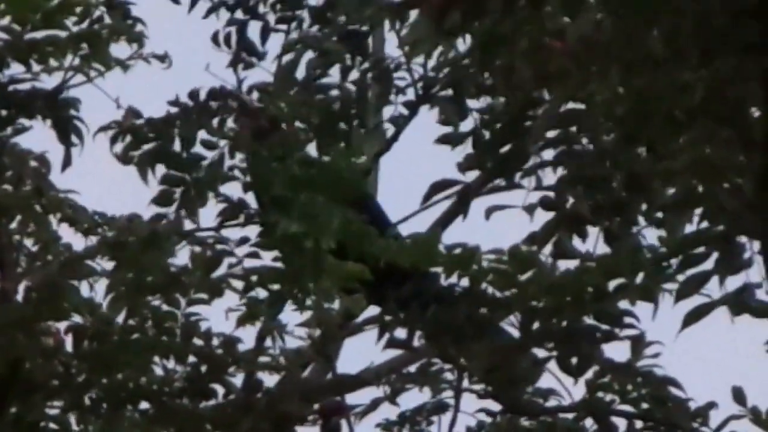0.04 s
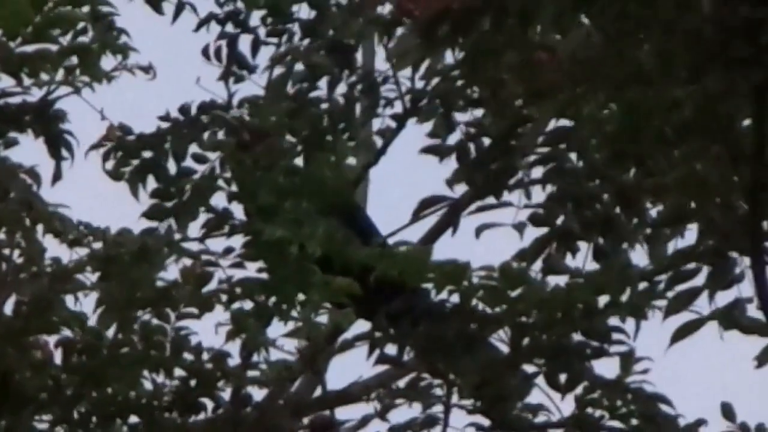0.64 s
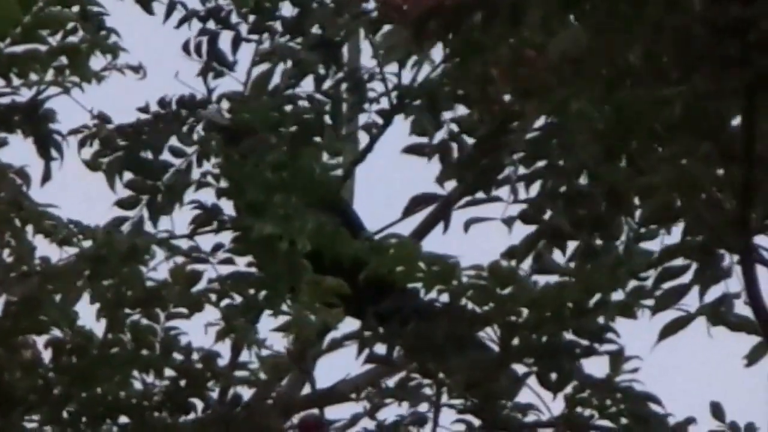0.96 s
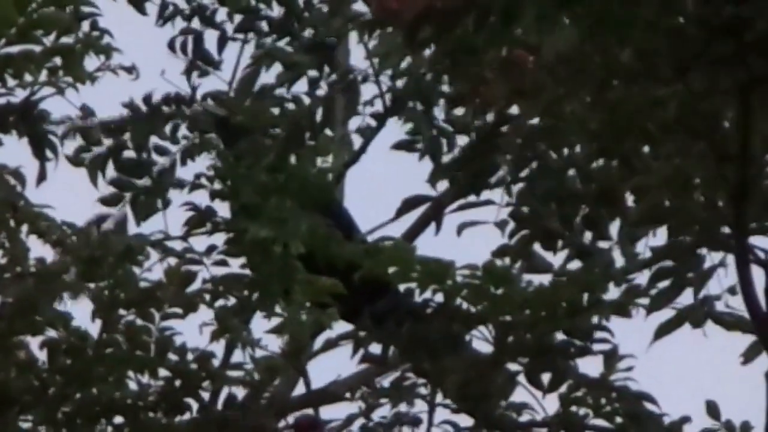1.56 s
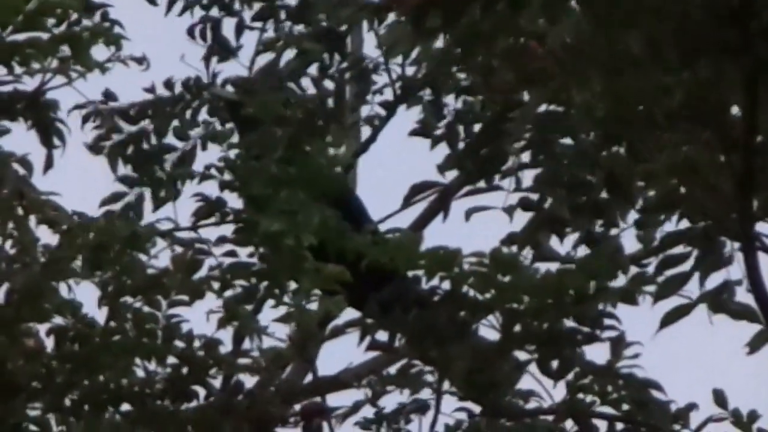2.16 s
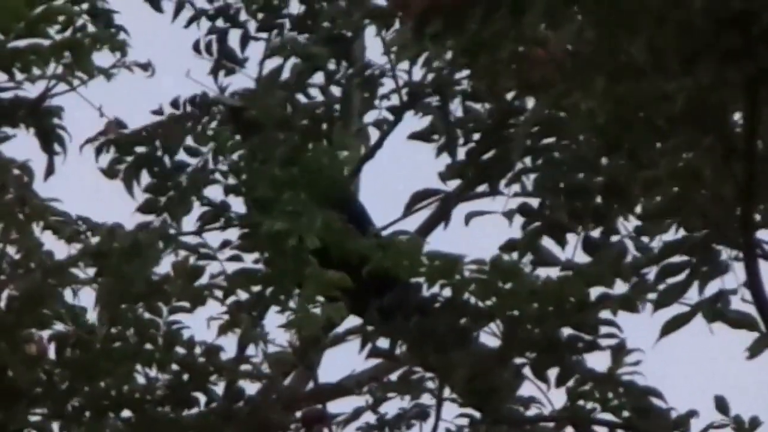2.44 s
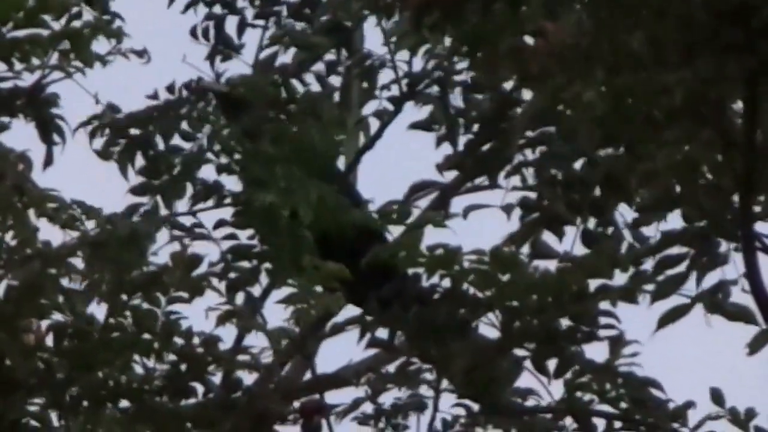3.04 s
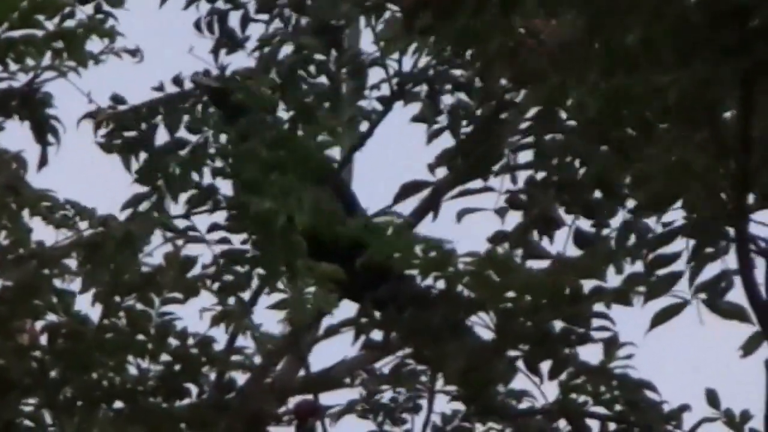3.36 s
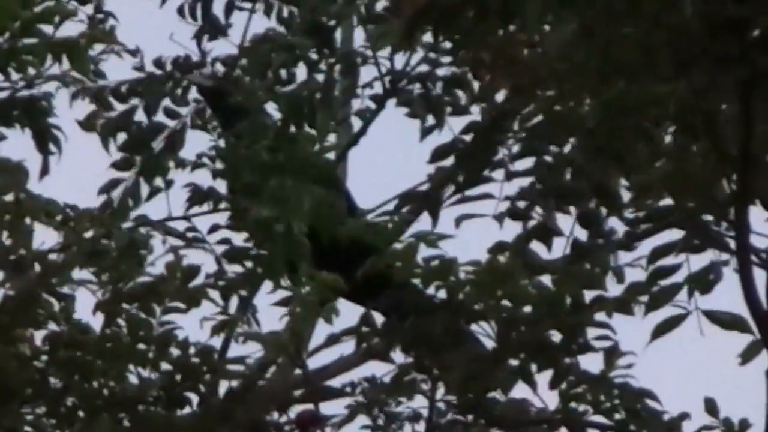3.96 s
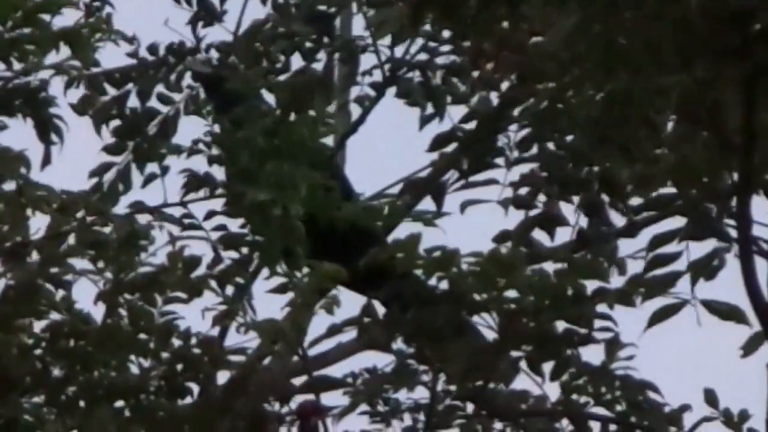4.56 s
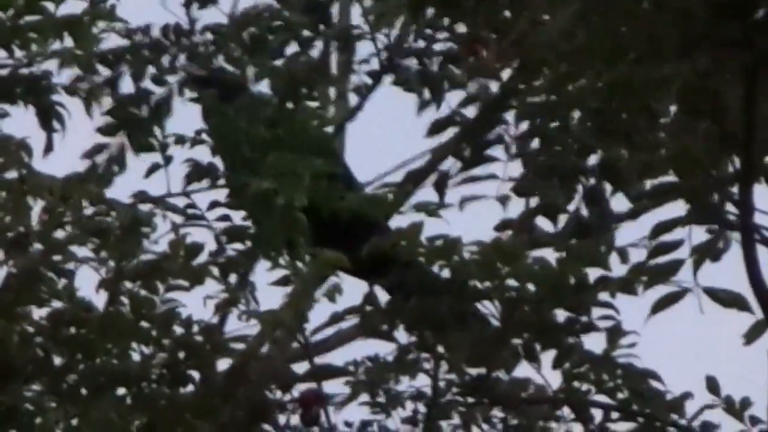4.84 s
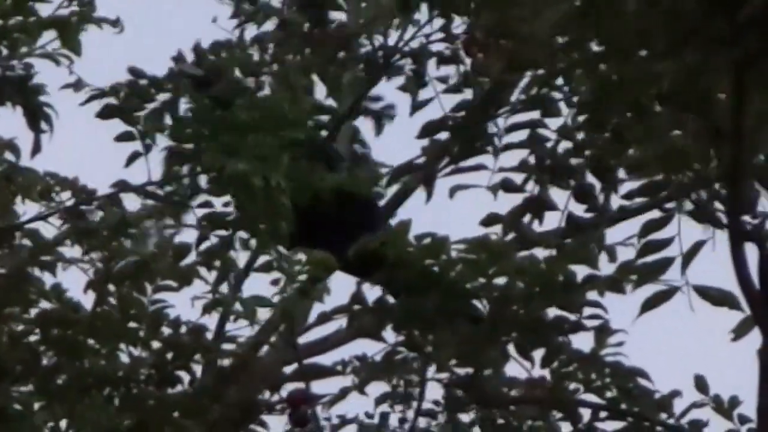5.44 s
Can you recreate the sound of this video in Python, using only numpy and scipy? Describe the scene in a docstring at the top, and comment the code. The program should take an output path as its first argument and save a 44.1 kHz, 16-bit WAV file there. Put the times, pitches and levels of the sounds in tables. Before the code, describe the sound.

A koel gives a quick run of shrill whistles, pauses, then calls twice at a lower pitch over faint distant traffic.

```python
"""A koel calls from a leafy tree: three shrill 'ko-el' whistles, a pause, then two lower ones.
Each whistle dips, peaks and slides down; when forced, the syrinx doubles its period and adds tones
half-way between the harmonics. Branches scatter the calls and the surroundings echo them.
Behind lie a faint town rumble, a motor's drone, brief low hums and the chirps of small birds."""
import sys
import numpy as np
from scipy import signal
from scipy.fft import rfft, irfft, next_fast_len
from scipy.io import wavfile
from scipy.ndimage import uniform_filter1d, minimum_filter1d, map_coordinates

SR = 44100
rng = np.random.default_rng(int(sys.argv[2]) if len(sys.argv) > 2 else 0)


def inscribe(sig):
    """Save sig as 16-bit PCM at rate SR to the path in sys.argv[1].

    A 1-D sig is mono; a 2-D sig holds one channel per row.
    Samples are clipped to [-1, 1] before scaling.
    """
    pcm = np.round(np.clip(np.atleast_2d(sig).T, -1, 1) * 32767)
    wavfile.write(sys.argv[1], SR, pcm.astype(np.int16))


N = 246519
TOP_HZ = 15150  # upper band limit


def amp(db):
    """Decibels as an amplitude ratio."""
    return 10 ** (np.asarray(db) / 20)


def unit(x):
    """x normalised to rms 1."""
    return x / np.sqrt(np.mean(x ** 2) + 1e-20)


def along(points, hz):
    """Interpolation of (frequency_hz, value) points on a logarithmic frequency axis."""
    f, v = np.transpose(points)
    return np.interp(np.log(hz + 1), np.log(f + 1), v)


def ramp(t, length):
    """A linear rise from 0 to 1 that starts at t = 0."""
    return np.clip(t / length, 0, 1)


def ease(t, length):
    """A raised-cosine rise from 0 to 1 that starts at t = 0."""
    return np.sin(np.pi / 2 * ramp(t, length)) ** 2


def bump(t, width):
    """A Gaussian pulse of height 1 around t = 0."""
    return np.exp(-(t / width) ** 2)


def wobble(rate, size):
    """Smooth random modulation: a spline through `rate` random knots a second."""
    knots = rng.standard_normal(int(size * rate / SR) + 4)
    return map_coordinates(knots, [np.arange(size) * rate / SR])


def phase_of(pitch_hz):
    """Phase in radians, the time integral of frequency."""
    return 2 * np.pi * np.cumsum(pitch_hz) / SR


def filtered(x, response):
    """Linear filtering: the spectrum of x times a frequency response."""
    m = next_fast_len(len(x) + SR // 2)
    return irfft(rfft(x, m) * response(np.fft.rfftfreq(m, 1 / SR)), m)[:len(x)]


def noise(size, response):
    """White noise coloured by a frequency response, at rms 1."""
    return unit(filtered(rng.standard_normal(size), response))


def add(track, sound, start_s):
    """Superposition of a sound on the track from start_s on."""
    start = round(start_s * SR)
    part = sound[max(-start, 0):N - start]
    track[max(start, 0):][:len(part)] += part


def traffic(level_db=-47.5):
    """Distant traffic sums incoherently to an even broadband rush."""
    # spectrum of the rush: frequency_hz, relative_density_db
    spectrum = [(25, -16), (60, -21.5), (100, -13.5), (160, -11.5), (270, -4.5), (340, -8), (550, -7),
                (1000, -7.5), (1500, -11.5), (2200, -19), (3500, -25.5), (5500, -30.5), (9000, -32),
                (15000, -33.5)]
    return noise(N, lambda f: amp(along(spectrum, f))) * amp(level_db + 0.29 * wobble(7.7, N))


def motor(start_hz=274, sag_hz_per_s=3.1, start_db=-56.5, fade_db_per_s=2, swell_width_s=0.14):
    """A distant motor's swelling drone: frequency falls as it slows, level as it recedes."""
    # swells of the drone: peak_s, rise_db
    swells = [(.44, 6.5), (1.35, 7.5), (2.299, 8), (2.62, 11), (3.43, 7)]
    t = np.arange(N) / SR
    pitch = start_hz - sag_hz_per_s * t + 3 * wobble(20, N)
    swell_db = sum(rise_db * bump(t - peak_s, swell_width_s) for peak_s, rise_db in swells)
    level_db = start_db - fade_db_per_s * t + swell_db + 2 * wobble(14, N)
    return amp(level_db) * np.sin(phase_of(pitch))


def far_hums(waver=0.0083):
    """Low tones with slight frequency modulation rise out of the masking rush and sink back."""
    # faint hums: start_s, length_s, pitch_hz, level_db
    hums = [(4.559, 0.35, 383.4, -52), (5.281, 0.7, 297, -49)]
    track = np.zeros(N)
    for start_s, length_s, pitch_hz, level_db in hums:
        progress = np.linspace(0, 1, int(length_s * SR))
        pitch = pitch_hz * (1 + waver * wobble(14, len(progress)))
        add(track, amp(level_db) * np.sin(np.pi * progress) * np.sin(phase_of(pitch)), start_s)
    return track


def canopy(x, scatter_db=-1.5, scatter_t60_s=0.27, echo_db=-12, leaf_db=1.0):
    """Multipath propagation: direct sound, quick scatter from foliage, reverberation from farther off."""
    # reverberation time of the surroundings: frequency_hz, t60_s
    decay_times = [(300, 2.1), (1400, 1.056), (5000, 1.1), (10000, 0.78), (15000, 0.37)]
    hz, frame_s, spectra = signal.stft(rng.standard_normal(SR), SR, nperseg=256)
    decay = amp(-60 * frame_s / along(decay_times, hz)[:, None])
    far = signal.istft(spectra * decay, SR, nperseg=256)[1][:SR]
    t = np.arange(SR) / SR
    far *= 1 - np.exp(-t / 0.0072)
    reflections = rng.standard_normal(SR) ** 3  # cubing makes a few stand out
    near = reflections * amp(-60 * t / scatter_t60_s) * (1 - np.exp(-t / .006))
    # leaves throw back short wavelengths best
    near = filtered(near / np.linalg.norm(near),
                    lambda f: amp(along([(2000, 0.0092), (10000, leaf_db)], f)))
    paths = amp(scatter_db) * near + amp(echo_db) * far / np.linalg.norm(far)
    paths[0] += 1  # the direct path
    return signal.fftconvolve(x, paths)


def small_birds(fall=0.067, twitter_count=14, twitter_hz=4100, twitter_db=-70):
    """Short downward frequency sweeps, a few clear in a faint twitter, blurred by scattering."""
    # the clearer chirps: start_s, length_s, pitch_hz, level_db
    chirps = [(3.03, 0.075, 4900, -66), (3.137, 0.059, 4350, -67), (3.2, .06, 4830, -67),
              (3.27, 0.036, 4170, -65), (3.604, .05, 3520, -62), (3.83, .08, 3840, -63),
              (5.18, 0.11, 4030, -60)]
    twitter = [(2.95 + 1.3 * when, .045, twitter_hz * (1 + .13 * (2 * high - 1)), twitter_db)
               for when, high in rng.random((twitter_count, 2))]
    track = np.zeros(N)
    for start_s, length_s, pitch_hz, level_db in list(chirps) + twitter:
        progress = np.linspace(0, 1, int(length_s * SR))
        pitch = pitch_hz * (1 + fall * (.5 - progress) + 0.0074 * wobble(217, len(progress)))
        add(track, amp(level_db) * np.sin(np.pi * progress) * np.sin(phase_of(pitch)), start_s)
    return canopy(track)[:N]


def gesture(call, ko_top_s=0.0242, break_s=.068, ko_sag=.082, ko_fade_db=1, slide_drop=.375,
            attack_s=0.018, release_s=0.025, doubling_rise_s=0.035, doubling_fade_s=0.054):
    """Frequency and amplitude modulation of a call: a sagging 'ko', a leap to 'el', a slide down."""
    _, length_s, scoop_hz, ko_hz, ko_db, el_top_s, el_hz, el_db, loss_db, depth, doubling_delay_s = call
    t = np.arange(int(length_s * SR)) / SR
    scoop = (1 - ramp(t, ko_top_s)) ** 2
    sag = ease(t - ko_top_s, break_s - ko_top_s)
    leap = np.sin(np.pi / 2 * ramp(t - break_s, el_top_s - break_s))
    slide = ramp(t - el_top_s, length_s - el_top_s) ** 1.32  # ever faster
    ko_pitch = ko_hz * (1 - ko_sag * sag) - scoop_hz * scoop
    el_pitch = el_hz * (1 - slide_drop * slide)
    pitch = (1 - leap) * ko_pitch + leap * el_pitch
    level_db = (1 - leap) * (ko_db - ko_fade_db * sag) + leap * (el_db - loss_db * slide)
    level_db -= 4 * bump(t - break_s, width=0.011)  # the voice falters between the syllables
    level_db -= 15.5 * (1 - ramp(t, attack_s) * ramp(length_s - t, release_s))
    doubling = depth * ramp(t - doubling_delay_s + doubling_rise_s / 2, doubling_rise_s)
    doubling *= ramp(length_s - 0.014 - t, doubling_fade_s)  # dies just before the call ends
    return t, pitch, level_db, doubling


def syrinx(call, overtone_db=1, rasp_db=-13, croak_db=-36, flutter_db=2.5, shimmer_db=2.5):
    """Source and filter: the throat shapes the membranes' harmonics; period doubling adds half orders."""
    # overtone response of the throat at low pitch: frequency_hz, relative_level_db
    low_throat = [(600, -60), (2000, -27.5), (2750, -38), (3400, -38.5), (4100, -44), (5100, -49.5),
                  (6900, -39.5), (8400, -51.5), (9600, -35.5), (10700, -31), (11900, -63), (13000, -51),
                  (15000, -72)]
    # the same at high pitch, where the throat changes shape: frequency_hz, relative_level_db
    high_throat = [(2000, -35.5), (3200, -32.5), (4000, -43), (4950, -33.5), (5700, -41), (6600, -55.5),
                   (7600, -34.5), (8350, -36.5), (9200, -44), (10100, -50), (11900, -41.5), (13300, -48.5),
                   (15000, -59)]
    # half-way tones of the doubled period: frequency_hz, relative_level_db
    half_tones = [(600, -61), (800, -40), (1750, -59.5), (2050, -20.5), (2400, -24), (3000, -50.5),
                  (4100, -42.5), (4800, -48), (5450, -26), (6300, -52), (8500, -35), (10000, -61.5),
                  (12200, -42), (15000, -57)]
    t, pitch, level_db, doubling = gesture(call)
    size = len(t)
    strain = np.clip((pitch - 1380) / 170, 0, 1)
    pitch = pitch * (1 + .0045 * wobble(350, size))
    phase = phase_of(pitch)
    # the slacker the membranes, the less evenly they close and the rougher the overtones
    jitter = (.2 - .14 * strain) * wobble(700, size)
    partials = np.zeros(size)
    for order in np.arange(1, 29) / 2:
        if order == 1:
            continue
        hz = order * pitch
        if order % 1:
            gain = np.clip(doubling, 0, 1) * amp(along(half_tones, hz))
        else:
            gain = amp(strain * along(high_throat, hz) + (1 - strain) * along(low_throat, hz))
        shimmer = amp(shimmer_db * wobble(219.8, size))
        partial = np.sin(order * phase + np.sqrt(order) * jitter + rng.uniform(0, 2 * np.pi))
        partials += gain * (hz < TOP_HZ) * shimmer * partial
    # turbulence puffs through the same throat once a cycle
    puffs = rng.standard_normal(size) * (1 + np.sin(phase))
    rasp = strain * filtered(puffs, lambda f: amp(along(high_throat, f)))
    rasp += (1 - strain) * filtered(puffs, lambda f: amp(along(low_throat, f)))
    voice = np.sin(phase) + amp(overtone_db) * partials + amp(rasp_db) * rasp
    envelope = amp(level_db + flutter_db * wobble(120.3, size)) * signal.windows.tukey(size, .04)
    # a brief hoarse croak before the tone locks in
    age = t / 0.0057
    croak = noise(size, lambda f: (f > 950) & (f < 1530)) * age * np.exp(1 - age)
    return np.sqrt(2) * envelope * voice + amp(croak_db) * croak


def koel():
    """Two bouts of calls reverberate; the first is already under way, so an earlier call still echoes."""
    # one row per 'ko-el': start_s, length_s, scoop_hz, ko_pitch_hz, ko_level_db, el_top_s, el_pitch_hz,
    # el_level_db, slide_loss_db, doubling_depth (0-1), doubling_delay_s
    calls = [ (-.27, 0.23, 201, 1544, -13, 0.11, 1620, -10, 10.5, 0.7, .04),
             (.027, 0.23, 181.5, 1526, -14.5, 0.11, 1616, -9, 13.5, 0.89, .03),
             (.321, 0.23, 388, 1631, -13.5, 0.1, 1689, -7.5, 12.8, .9, 0.14),
             (.631, 0.23, 365, 1672, -12.5, 0.1, 1699, -9.5, 8.5, 0.9, 0.14),
             (4.612, .240, 89, 1083, -31.5, .124, 1382, -13.5, 15, 0.08, .15),
             (4.926, 0.21, 77, 1320, -16, 0.096, 1451, -11, 16.5, 0.3, 0.14)]
    track = np.zeros(N)
    for call in calls:
        add(track, canopy(syrinx(call)), start_s=call[0])
    return track


def scene():
    """Superposition of the koel, the distant town and a few far birds."""
    return (koel() + traffic() + motor() + far_hums() + small_birds())[None]


def record(dry, ceiling=0.86, whine_hz=12275, whine_half_width_hz=32, whine_db=-76):
    """Narrow-band noise adds a faint whine; limiting rounds the highest peaks; a low-pass ends the band."""
    whine = noise(N, lambda f: 1 / (1 + ((f - whine_hz) / whine_half_width_hz) ** 2))
    x = dry[0] + amp(whine_db) * whine
    needed_gain = np.minimum(1, ceiling / (np.abs(x) + 1e-9))
    smooth_gain = uniform_filter1d(minimum_filter1d(needed_gain, size=300), size=300)
    return filtered(x * smooth_gain, lambda f: f < TOP_HZ)[None]


dry = scene()
out = record(dry)
inscribe(out)
```